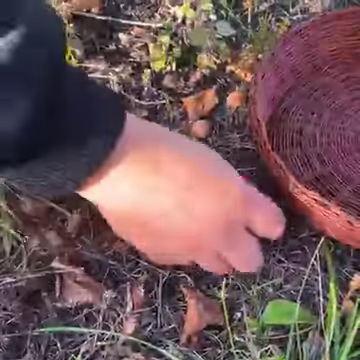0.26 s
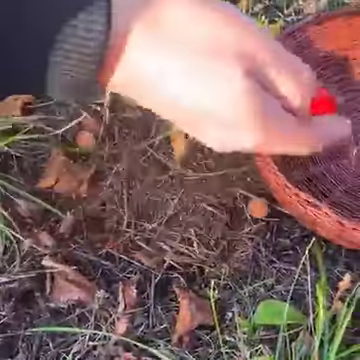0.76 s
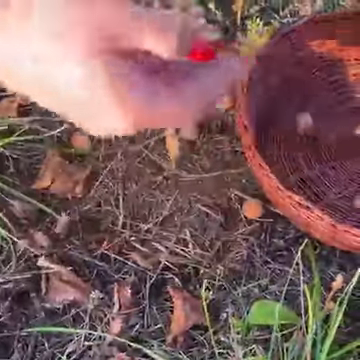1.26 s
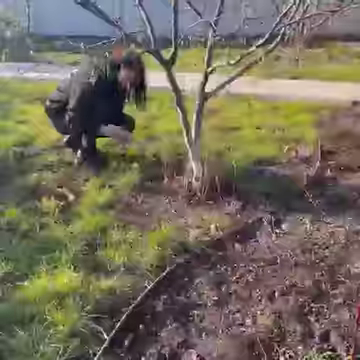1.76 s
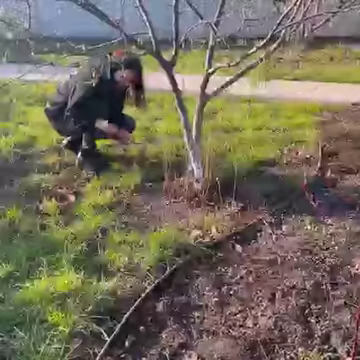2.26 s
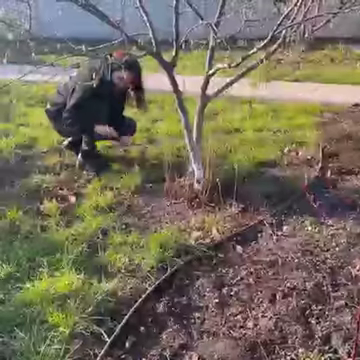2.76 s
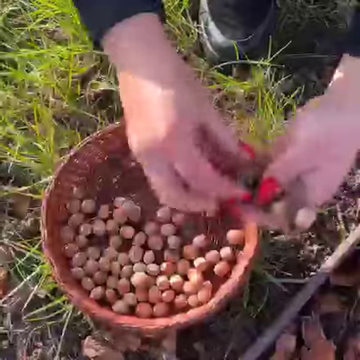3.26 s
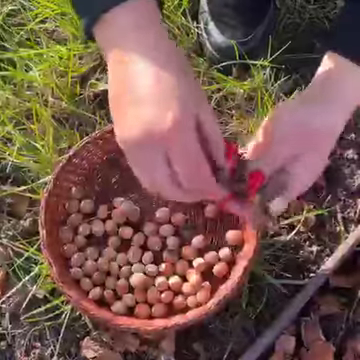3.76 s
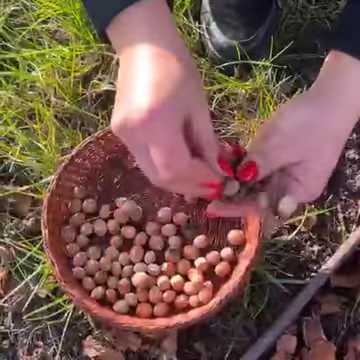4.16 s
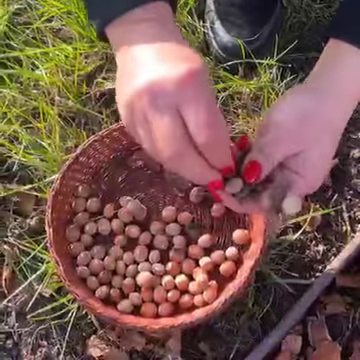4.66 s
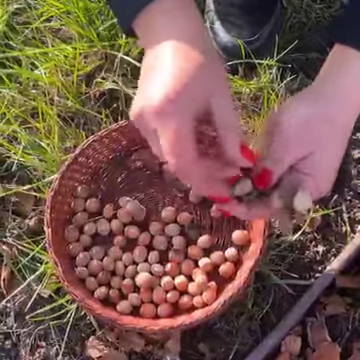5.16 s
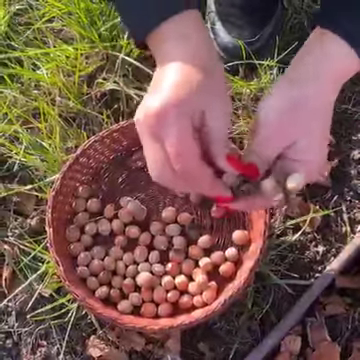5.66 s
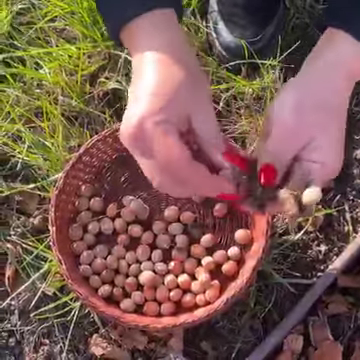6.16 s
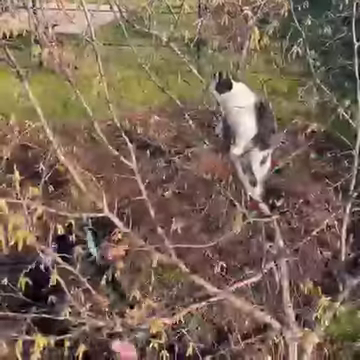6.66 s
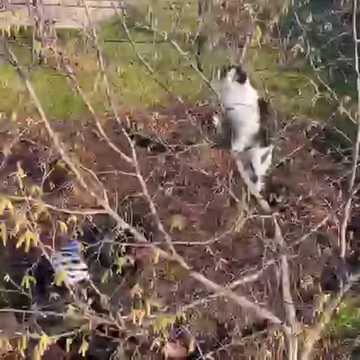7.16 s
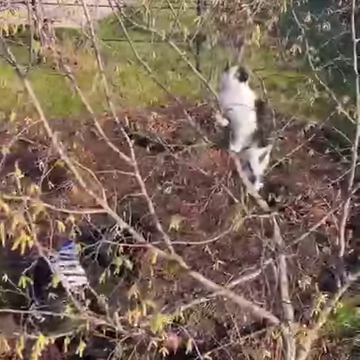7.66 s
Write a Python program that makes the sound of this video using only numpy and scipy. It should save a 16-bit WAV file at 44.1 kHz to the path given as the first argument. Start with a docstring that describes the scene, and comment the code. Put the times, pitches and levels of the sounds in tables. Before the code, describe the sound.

Fallen nuts clack into a wicker basket, then dry leaves and husks crackle and snap under fingers in a quiet garden, with sleeve rubbing close by.

```python
"""A sleeve rubs close by over a faint outdoor rumble, and soft bumps shake the hand-held microphone.
Someone gathers fallen nuts from dry leaves and grass in a quiet garden, husking them over a wicker basket.
Nuts clack into the basket, dry leaves crackle under the fingers, and stalks and shells snap sharply.
Rubbing and crackling are filtered trains of tiny fractures; snaps are filtered pulses and noise bursts;
knocks and bumps are damped resonances, and the garden is filtered noise."""
import sys
import numpy as np
from scipy import signal
from scipy.fft import rfft, irfft
from scipy.io import wavfile

SR = 44100
rng = np.random.default_rng(int(sys.argv[2]) if len(sys.argv) > 2 else 0)


def generate_wav(sig):
    """Save sig (samples, or channels by samples) to the path in sys.argv[1] as 16-bit PCM at SR."""
    pcm = np.round(np.clip(np.atleast_2d(sig).T, -1, 1) * 32767).astype(np.int16)
    wavfile.write(sys.argv[1], SR, pcm)


N = 349227  # length in samples
CUTOFF_HZ = 15900  # upper edge of the sound
LEAD_S = .004  # a short noise swells for up to this long before the pulse of a snap

# The fingers picking at the husks. Each row: time in seconds, relative activity in dB.
PICKING = [(3.05, -53), (3.2, 0.5), (4.3, -3), (4.7, -7), (5.1, -11), (5.3, 0), (6.4, -1), (6.55, -52)]


def from_db(db):
    """Amplitude ratio of a level difference in decibels."""
    return 10 ** (np.asarray(db) / 20)


def rms_one(x):
    """Normalise the mean power to 1."""
    return x / np.sqrt(np.mean(x ** 2) + 1e-20)


def in_time(rows):
    """Linear interpolation of each column of a curve, sample by sample."""
    s, *columns = np.transpose(rows)
    return [np.interp(np.arange(N) / SR, s, c) for c in columns]


def band(x, low_hz, high_hz, order=2):
    """Causal band-pass with a maximally flat passband."""
    edges_hz = [low_hz, min(high_hz, .45 * SR)]
    return signal.sosfilt(signal.butter(order, edges_hz, "band", fs=SR, output="sos"), x + 1e-18)


def drift(rate):
    """Low-passed noise: smooth chance with a spread of 1, changing about `rate` times a second."""
    step = 20  # samples between the computed points
    pole = np.exp(-2 * np.pi * rate * step / SR)
    noise = rng.standard_normal(N // step + 2002)
    slow = signal.lfilter([1], [1, -2 * pole, pole * pole], noise)[2000:]  # skip the settling
    return np.interp(np.arange(N) / step, np.arange(len(slow)), rms_one(slow))


def ring(x, hz, t60):
    """Damped resonator: a unit click sets a sine of initial height 1 ringing, down 60 dB after t60 seconds."""
    r = from_db(-60 / (t60 * SR))
    w = 2 * np.pi * hz / SR
    return signal.lfilter([0, np.sin(w)], [1, -2 * r * np.cos(w), r * r], x + 1e-18)


def add(out, s, sound):
    """Superposition: mix a short sound in at time s."""
    at = round(s * SR)
    out[at:at + len(sound)] += sound[:N - at]


def grains(per_s, spread_db, clump_db):
    """Shot noise of tiny fractures: uneven sizes, either sign, arriving in clumps; rms 1."""
    born = rng.random(N) < per_s * from_db(clump_db * drift(40)) / SR
    sizes = from_db(spread_db * np.minimum(rng.exponential(1, N), 4))
    return rms_one(born * sizes * rng.choice([-1, 1], N))


def coloured(source, spectrum, ripple_db=0.):
    """Minimum-phase filtering: a causal response follows a spectrum, with chance ripples; rms 1."""
    hz, db = np.transpose(spectrum)
    log_hz = np.log(np.maximum(np.fft.rfftfreq(4096, 1 / SR), 1))
    knots = np.log(np.geomspace(200, 16000, 26))
    ripples = np.interp(log_hz, knots, rng.standard_normal(len(knots)))
    curve_db = np.interp(log_hz, np.log(hz), db) + ripple_db * ripples
    # folding the cepstrum onto positive times gives the minimum phase
    cepstrum = irfft(np.log(from_db(curve_db)))
    cepstrum[1:len(cepstrum) // 2] *= 2
    cepstrum[len(cepstrum) // 2 + 1:] = 0
    response = irfft(np.exp(rfft(cepstrum)))
    return rms_one(signal.oaconvolve(source, response)[:len(source)])


def gesture(start_s, length_s, attack_s, release_s, build_db=0):
    """Envelope of one movement: it sets in, builds up to 1 over its length and decays exponentially."""
    t = np.arange(N) / SR - start_s
    onset = np.clip(t / attack_s, 0, 1)
    build = from_db(build_db * (np.clip(t / length_s, 0, 1) - 1))
    loss = np.maximum(t - length_s, 0) / release_s
    return onset * build * np.exp(-np.minimum(loss, 20))


def garden():
    """Broadband noise: far, smooth outdoor rumble and hiss, with a hollow narrow-band drone passing through."""
    # Distant rumble. Each row: time in seconds, level in dB.
    air = [(0, -57.5), (1.05, -56), (2.5, -54), (3.4, -56), (4.2, -56.5), (4.9, -56), (6.4, -53.5),
           (7.92, -53.5)]
    # Faint, far-off drone swelling and fading. Each row: time in seconds, level in dB.
    drone_swell = [(3.6, -70.5), (4.6, -60.5), (5.1, -58.5), (5.7, -60), (6.4, -61), (7.0, -66)]
    # Spectrum of the air. Each row: frequency in Hz, relative density in dB per Hz.
    air_spectrum = [(20, -18), (50, -4.5), (110, 1), (195, -5.5), (290, -2), (450, -6.5), (750, -23.5),
                    (1100, -11.5), (1600, -16), (3000, -25), (6000, -23.5), (10000, -25), (16000, -26.5)]
    air_db, = in_time(air)
    drone_db, = in_time(drone_swell)
    drone = from_db(drone_db) * rms_one(band(rng.standard_normal(N), 478, 867))
    return drone + from_db(air_db) * coloured(rng.standard_normal(N), air_spectrum)


def sleeve():
    """Friction noise: thousands of threads catch and let go each second, and the grip rumbles."""
    # Strokes of the sleeve. Each row: start in seconds, length in seconds, relative level in dB.
    strokes = [(-0.04, 0.4, -46.5), (0.455, 0.3, -52), (0.86, 0.067, -53), (1.201, 0.19, -49.5),
               (1.366, 0.29, -46.5), (1.913, 0.49, -56), (2.448, 0.32, -53.5), (2.713, 0.29, -53),
               (2.992, 0.17, -49), (4.84, 1.25, -67), (6.517, 0.37, -57), (6.758, 0.23, -46.5),
               (6.985, 0.17, -45.5), (7.246, 0.13, -47), (7.47, 0.2, -52), (7.854, 0.1, -50.5)]
    # A brighter swish of the sleeve. Each row: time in seconds, level in dB.
    swish_swell = [(7.22, -61), (7.29, -55), (7.35, -51), (7.41, -52), (7.45, -64)]
    # The hand shifting its grip on the housing. Each row: time in seconds, rumble level in dB.
    grip_shift = [(6.45, -82), (6.6, -63), (6.8, -49.5), (6.95, -53), (7.15, -48.5), (7.25, -58),
                  (7.38, -54.5), (7.7, -58), (7.9, -70)]
    # Spectrum of the cloth. Each row: frequency in Hz, relative density in dB per Hz.
    cloth_spectrum = [(25, -23), (50, -13), (115, 1), (190, -0.5), (350, 0), (600, 0.5), (950, -3),
                      (1800, -4), (2600, -9), (4000, -15), (7000, -19.5), (11000, -25.5), (16000, -31)]
    attack_s, release_s, rest_db, cloth_db = 0.091, 0.088, -69.5, 4.0  # cloth_db lifts strokes and rest alike
    power = from_db(rest_db) ** 2
    for s, length_s, db in strokes:
        power = power + (from_db(db) * gesture(s, length_s, attack_s, release_s)) ** 2
    cloth = from_db(cloth_db) * np.sqrt(power) * coloured(grains(14000, 3.16, 1.2), cloth_spectrum)
    swish_db, = in_time(swish_swell)
    swish = from_db(swish_db) * rms_one(band(grains(14000, 3.8, 0.76), 1500, 3000))
    grip_db, = in_time(grip_shift)
    grip = from_db(grip_db) * rms_one(band(rng.standard_normal(N), 84, 196))
    return cloth + swish + grip


def bumps(low_cut_hz=170, deepest_hz=55, shudder_db=-12, shudder_s=0.0079):
    """Modal excitation: a contact and its brief shudder shake damped modes; the housing sways in the hand."""
    # Soft bumps on the microphone's housing. Each row: time in seconds, relative contact level in dB,
    # contact brightness in Hz, sway in Hz, relative sway level in dB, sway t60 in seconds.
    contacts = [(0.31, -5.5, 510, 194, -17, 0.044), (0.6242, -7, 606, 152, -19.5, 0.061),
                (1.681, -10.5, 750, 184, -18, 0.018), (6.5506, -26.5, 700, 91, -36.5, 0.083),
                (6.6161, -24.5, 1500, 160, -44, 0.03), (6.8232, -14.5, 2500, 100, -26, 0.055)]
    # The housing's modes. Each row: frequency in Hz, relative level in dB, t60 in seconds.
    modes = [(263, -10, 0.019), (448, -14.5, 0.027), (697, -5, 0.0074), (960, -9.5, 0.0065),
             (1430, -12, 0.0094)]
    out, t = np.zeros(N), np.arange(N // 60) / SR
    click = 1. * (t == 0)
    for s, db, contact_hz, sway_hz, sway_db, sway_t60 in contacts:
        shudder = rng.standard_normal(len(t)) * np.exp(-t / shudder_s)
        force = click + from_db(shudder_db) * shudder / np.linalg.norm(shudder)
        push = band(force, low_cut_hz, contact_hz, order=1)
        shaken = sum(from_db(mode_db) * ring(push, hz, t60) for hz, mode_db, t60 in modes)
        add(out, s, from_db(db) * shaken)
        sway = band(ring(click, sway_hz, sway_t60), sway_hz / 3, 3 * sway_hz, order=1)
        add(out, s, from_db(sway_db) * sway)
    return band(out, deepest_hz, CUTOFF_HZ)


def knocks(t60=0.021):
    """Impulse response of one mode: wicker answers a nut with one hollow, quickly damped note."""
    # Nuts knocking on the basket. Each row: time in seconds, level in dB, pitch in Hz.
    hits = [(4.008, -42, 1480), (4.792, -33, 1520), (5.9192, -26, 545), (5.9667, -34.5, 333),
            (5.967, -36, 1280), (7.576, -34, 390)]
    out, click = np.zeros(N), signal.unit_impulse(N // 100)
    for s, db, hz in hits:
        add(out, s, from_db(db) * ring(click, hz, t60))
    return out


def husks(count=12, per_s=9, level_db=-58):
    """Random excitation of resonators: bits of husk rolled in the fingers tick faintly at several pitches."""
    busy_db, = in_time(PICKING)
    cycles = 16  # periods until a tick is down 60 dB
    ticks = 0
    for hz in np.geomspace(1400, 12000, count):
        rung = ring(grains(per_s, 4.1, 1.5), hz, cycles / hz)
        ticks = ticks + rms_one(band(rung, hz / 2, hz * 2))
    return from_db(level_db + busy_db) * rms_one(ticks)


def pressing():
    """Power addition of gains for crunch and crackle: presses join the light rustle of busy fingers."""
    # Presses of the hand into dry leaves and husks. Each row: start in seconds, length in seconds,
    # relative crunch level in dB, relative fine crackle level in dB.
    presses = [(1.558, 0.079, -46, -45), (1.639, 0.047, -39, -37.5), (1.704, 0.11, -49, -38),
               (1.867, 0.073, -58, -43.5), (1.967, 0.14, -57, -40.5), (2.01, 0.027, -42.5, -30.5),
               (2.132, 0.06, -48, -41), (2.207, 0.091, -48, -41), (2.313, 0.099, -52.5, -50),
               (2.364, 0.022, -32.5, -29), (2.548, 0.013, -49.5, -49), (2.583, 0.18, -62, -61),
               (3.11, 0.14, -53.5, -55), (3.263, 0.119, -51, -62.5), (3.403, 0.016, -56, -39.5),
               (3.46, 0.11, -59.5, -61), (3.578, 0.035, -47.5, -48), (3.709, 0.037, -50, -63),
               (3.79, 0.036, -54, -55), (3.875, 0.16, -53, -50), (4.028, 0.11, -57, -58),
               (4.144, 0.05, -49, -43.5), (4.207, 0.043, -53, -47.5), (4.27, 0.039, -57, -57),
               (4.415, 0.03, -55.5, -56), (4.5, 0.049, -54.5, -54), (4.782, 0.012, -47, -39.5),
               (4.886, 0.13, -58.5, -56), (5.147, 0.064, -53.5, -53), (5.292, 0.061, -56, -48),
               (5.492, 0.1, -58, -45), (5.66, 0.18, -62, -53.5), (5.94, 0.068, -56.5, -55.5),
               (6.015, 0.01, -48, -39), (6.057, 0.033, -50, -46), (6.259, 0.037, -61.5, -50),
               (6.381, 0.046, -52, -50), (6.655, 0.024, -35, -37.5)]
    attack_s, build_db, release_s = 0.0096, 4, 0.011
    rustle_crunch_db, rustle_crackle_db = -72, -68  # between presses, relative to the fingers' activity
    busy_db, = in_time(PICKING)
    crunch = from_db(busy_db + rustle_crunch_db)
    crackle = from_db(busy_db + rustle_crackle_db)
    for s, length_s, crunch_db, crackle_db in presses:
        press = gesture(s, length_s, attack_s, release_s, build_db)
        crunch = np.hypot(crunch, from_db(crunch_db) * press)
        crackle = np.hypot(crackle, from_db(crackle_db) * press)
    return crunch, crackle


def leaves(count=6, slip_db=2.5, slips_per_s=35):
    """Fracture noise under stick-slip: leaves of different colours take turns, ribs crunch, blades crackle."""
    # How thick the leaves are. Each row: time in seconds, share of thick ones from 0 to 1.
    thickness = [(5.5, 0), (5.7, 0), (6.1, 0.55), (6.3, 0.7), (6.42, 0), (6.62, 0.97)]
    # Spectra of crunch, thin and thick crackle. Each row: frequency in Hz, relative density in dB per Hz.
    crunch_spectrum = [(150, -8), (700, -6), (1400, -2.5), (2800, 2), (4200, 2), (6500, -4.5), (8000, -4),
                       (11000, -11)]
    thin_spectrum = [(3000, -40), (5500, -7), (7500, -11), (9500, 1.5), (11500, 0), (13500, -3.5),
                     (16000, -10.5)]
    thick_spectrum = [(3000, -44), (6000, -16), (8000, 1), (9800, 2.5), (11500, 2), (13500, -16),
                      (16000, -40.5)]
    ripple_db, takeover_db = 3.6, 6.5
    crunch, crackle = pressing()
    thick = np.clip(in_time(thickness)[0], 0, 1)
    ribs, blades, power = 0, 0, 0
    for _ in range(count):
        touch = from_db(takeover_db * drift(17))   # how hard this leaf is pressed just now
        fractures = grains(380, 4.0, 5.0)
        rib_breaks = fractures + from_db(-8) * grains(2700, 1.8, 2.7)
        ribs += touch * coloured(rib_breaks, crunch_spectrum, ripple_db)
        splits = fractures + from_db(2.5) * grains(2500, 1.6, 2.5)
        thin_blade = np.sqrt(1 - thick) * coloured(splits, thin_spectrum, ripple_db)
        thick_blade = np.sqrt(thick) * coloured(splits, thick_spectrum, ripple_db)
        blades += touch * (thin_blade + thick_blade)
        power += touch ** 2
    slip = rms_one(from_db(slip_db * drift(slips_per_s)))   # the hand sticks and slips
    return slip * (from_db(3.0) * crunch * ribs + from_db(0.5) * crackle * blades) / np.sqrt(power)


def snap(level_db, hz, colour, splinter_db=-3.0, splinter_s=0.0024, scatter_db=-11, scatter_s=0.0042,
         ring_db=-7, ring_cycles=20, longest_ring_s=0.02, ripple_db=3.5, swell_db=-11, swell_s=0.0016):
    """Brittle fracture: a short noise swell, one pulse, a burst of splinters, a ring, scatter off the ground."""
    t = (np.arange(N // 200) - round(LEAD_S * SR)) / SR
    in_4_ms = np.sqrt(.004 * SR / len(t))  # the level counts the energy as if spread over 4 ms
    noise, scatter = rng.standard_normal((2, len(t))) * rng.exponential(1, (2, len(t))) ** .5
    force = rms_one(1. * (t == 0))
    force += from_db(swell_db) * rms_one((t < 0) * noise * np.exp(-abs(t) / swell_s))
    force += from_db(splinter_db) * rms_one((t >= 0) * noise * np.exp(-abs(t) / splinter_s))
    force += from_db(scatter_db) * rms_one((t >= 0) * scatter * np.exp(-abs(t) / scatter_s))
    sound = coloured(force, colour, ripple_db)
    sound = sound + from_db(ring_db) * rms_one(ring(sound, hz, min(ring_cycles / hz, longest_ring_s)))
    size = np.std(band(sound, 3000, 7500))  # levels hold in this band
    return from_db(level_db) * in_4_ms * sound / size


def drops():
    """Impact: nuts falling on the bare wicker share one clack spectrum, each with its own ring."""
    # Nuts dropped into the nearly empty basket.
    # Each row: time in seconds, level in dB at 3-7.5 kHz, ring in Hz.
    falls = [(1.0956, -40.5, 2300), (1.1678, -42, 1750), (1.276, -42, 2300), (1.337, -49.5, 1720)]
    # Their dry clack. Each row: frequency in Hz, relative density in dB per Hz.
    clack = [(100, -20), (350, 7.5), (900, 3.5), (1400, 3.5), (2400, 6), (5000, -2.5), (9500, -4.5),
             (13000, -17), (16000, -18)]
    out = np.zeros(N)
    for s, level_db, hz in falls:
        sound = snap(level_db, hz, clack, splinter_db=-1.5, scatter_db=-16, swell_db=-21,
                     ring_db=-10.5, ripple_db=1.5)
        add(out, s - LEAD_S, sound)
    return out


def small_snaps(count=260, crunch_share_db=-4.0, spread_db=4.5, tilt_db=7):
    """Random fracture: thin fibres break at chance moments, level following the hand's crunch, colours varied."""
    crunch, _ = pressing()
    out = np.zeros(N)
    for when, pitch, size, tilt in rng.random((count, 4)):
        at = int(when * N)
        chance_db = -spread_db * np.log(max(size, np.exp(-3)))
        level_db = 20 * np.log10(crunch[at] + 1e-9) + crunch_share_db + chance_db
        air_db = tilt_db * (2 * tilt - 1) - 4
        colour = [(200, -20), (900, -28), (2000, -12), (4000, 0), (6500, 15), (12000, air_db),
                  (16000, air_db - 9)]
        sound = snap(level_db, 2000 * 6 ** pitch, colour, splinter_db=-5.0, splinter_s=.0015, scatter_db=-1)
        add(out, at / SR, sound)
    return out


def snaps():
    """Spectral balance of fracture: thick stalks give more thud and body, thin dry leaves more edge and air."""
    # The loudest stalks, husks and shells snapping. Each row: time in seconds, level in dB at 3-7.5 kHz,
    # ring in Hz, body in dB and air in dB, both relative to 5 kHz.
    breaks = [(1.6259, -36.5, 5370, -1, -19), (1.7183, -30, 11400, 2, 4), (1.7476, -29.5, 6000, -8, 7),
              (1.7658, -36.5, 11400, -7, 14), (1.7752, -41, 10200, -5, 19), (1.7885, -37, 10100, -3, -1),
              (1.8004, -38.5, 9800, 10, -3), (1.8094, -22.5, 11800, -8.5, -1), (1.8116, -26, 4920, -2, 16),
              (1.9126, -44.5, 10000, -6, 11), (1.943, -46.5, 11400, 3, 12), (1.9733, -37.5, 11300, -5, 15),
              (2.0238, -33, 9200, 1, 3), (2.0317, -32, 9000, -5, -7), (2.0638, -37, 9800, 6.5, 12),
              (2.102, -32.5, 13200, 3.5, 4), (2.374, -26.5, 2980, -1, 2), (2.5315, -45, 2580, 10.5, -20),
              (2.9682, -45, 10200, 5.5, 6.5), (3.1126, -40.5, 4960, -2, -1), (3.1404, -30.5, 8900, -6, 7.5),
              (3.1942, -39.5, 2140, 2.5, -6), (3.262, -38, 2580, -3, -4), (3.3533, -43, 13000, -8, 11),
              (3.3952, -42, 3460, -8, -29), (3.6963, -47, 10500, 1, 26), (3.7209, -42, 2430, -11, -20.5),
              (3.7341, -42.5, 4070, -2, -18), (3.789, -43, 6260, -16, -16), (3.9329, -37, 11700, -2, 2.5),
              (3.9642, -45.5, 4640, -3, -4), (3.983, -48, 12800, 3, 10), (4.009, -37.5, 11200, 6, 2),
              (4.1808, -45, 10800, -10, 2), (4.5499, -45.5, 6900, -12.5, -4), (4.6113, -40, 7750, -3.5, 14),
              (4.7939, -39, 3600, -6, 3), (4.9213, -32.5, 7540, -7.5, 3), (4.929, -39.5, 4400, -10, -8),
              (5.4003, -47.5, 3520, 5, -4), (5.49, -48.5, 3100, 4, -18), (5.523, -37, 12500, 2, 16),
              (5.5277, -34.5, 3140, 3, 5), (5.5399, -36, 4380, 0.5, 4), (5.5777, -35, 12100, -1, 10),
              (5.6137, -39.5, 3840, -14, 3), (5.7082, -47.5, 1840, 3, 5), (5.7941, -37.5, 3450, -8, 4),
              (5.8468, -46.5, 3150, 7, -10), (5.8687, -41, 3400, 1, 8), (5.92, -44.5, 11200, 12, 10),
              (5.9681, -36, 4800, 6.5, 9), (5.984, -45, 2800, 4, -7), (6.0228, -39.5, 7800, 4, 7),
              (6.1797, -41, 2820, 4, 3), (6.4033, -47.5, 2430, 11, 1), (6.4172, -41, 7100, 1, 1),
              (6.4433, -47.5, 2240, 10.5, -20), (6.616, -48, 2500, 5, -21), (6.6615, -33, 10800, 6, -3),
              (6.669, -31, 7650, -5, -4), (6.6785, -33, 4230, -6, -13), (6.6824, -34, 2250, -3, -14),
              (6.693, -37.5, 2530, 3, -18), (7.2589, -52, 10600, 1, 14)]
    thud_under_body_db, edge_share = 12.5, 0.84  # the edge near 10 kHz follows a share of the air
    out = np.zeros(N)
    for s, level_db, hz, body_db, air_db in breaks:
        thud_db, edge_db = body_db - thud_under_body_db, edge_share * air_db
        colour = [(100, thud_db - 8.0), (350, thud_db), (900, thud_db), (1400, body_db), (2400, body_db),
                  (4000, 0), (7500, 0), (10000, edge_db), (13000, air_db), (16000, air_db - 11)]
        add(out, s - LEAD_S, snap(level_db, hz, colour))
    return out


def scene():
    """Free field: everything sums in the open air, so nothing reverberates."""
    background = garden() + sleeve() + bumps()
    basket = knocks() + drops()
    hands = husks() + leaves() + small_snaps() + snaps()
    return (background + basket + hands)[None]


def record(dry):
    """Band limitation: an elliptic low-pass cuts the top steeply."""
    return signal.sosfilt(signal.ellip(10, .2, 80, CUTOFF_HZ, fs=SR, output="sos"), dry)


dry = scene()
out = record(dry)
generate_wav(out)
```